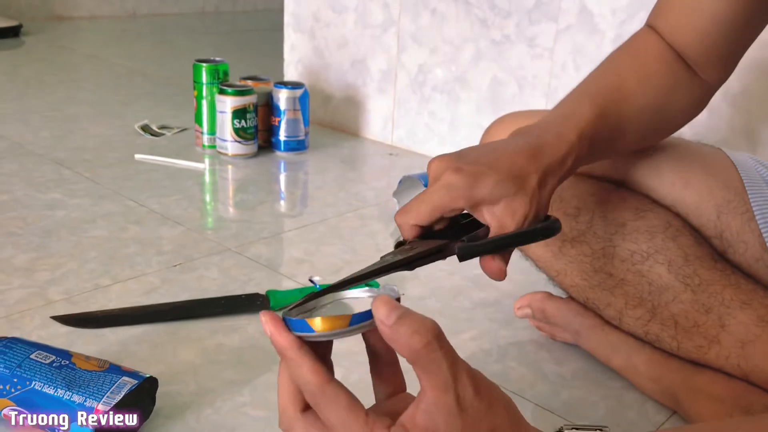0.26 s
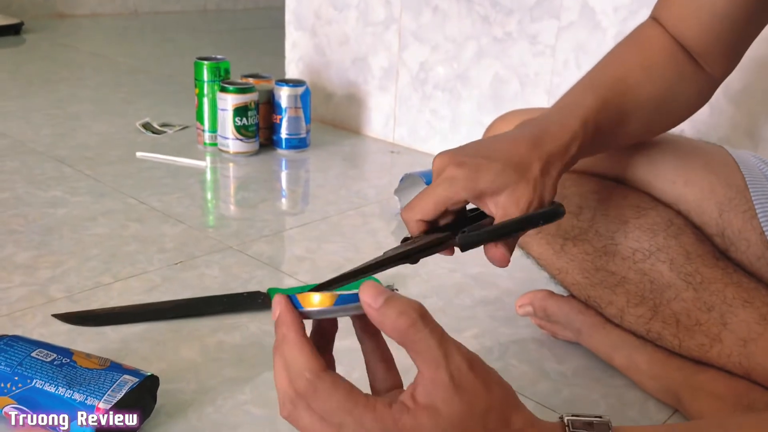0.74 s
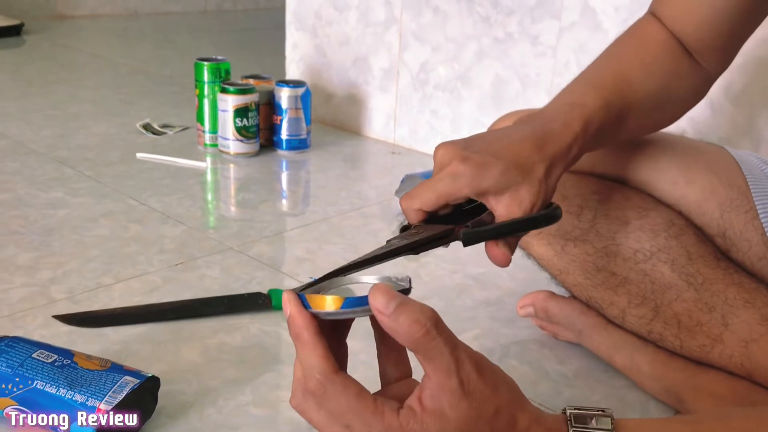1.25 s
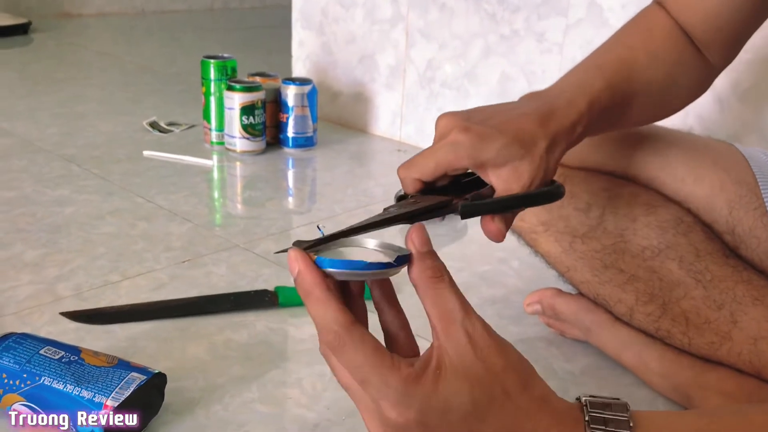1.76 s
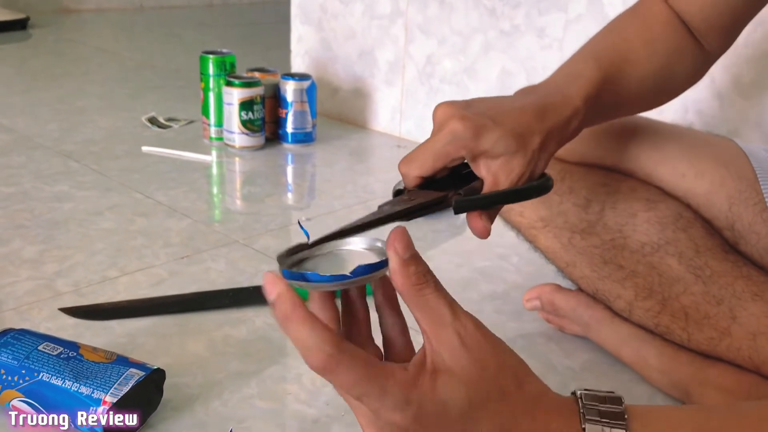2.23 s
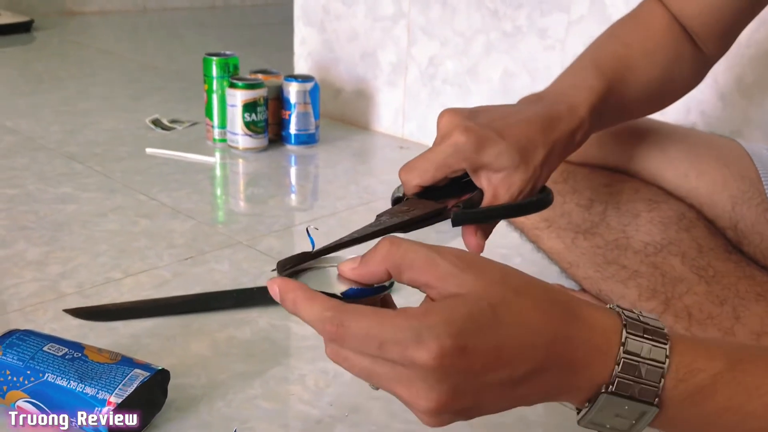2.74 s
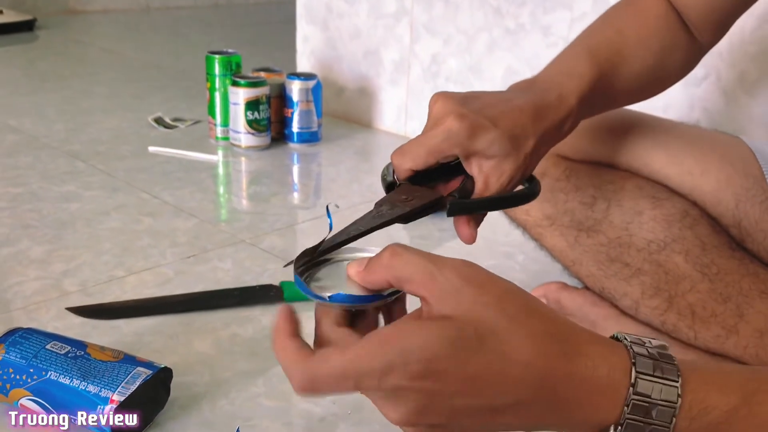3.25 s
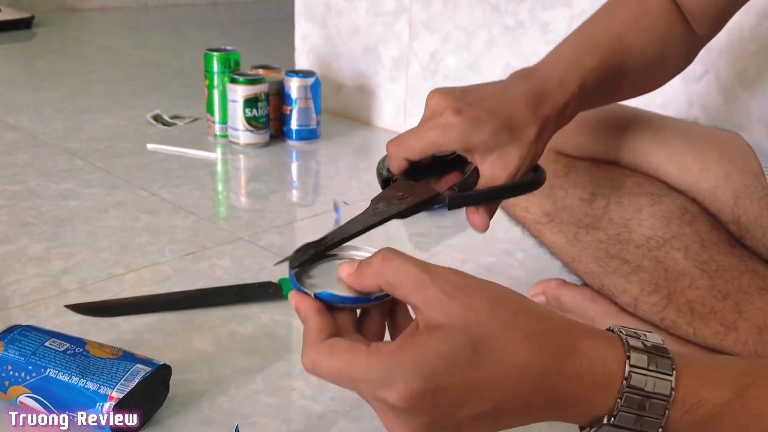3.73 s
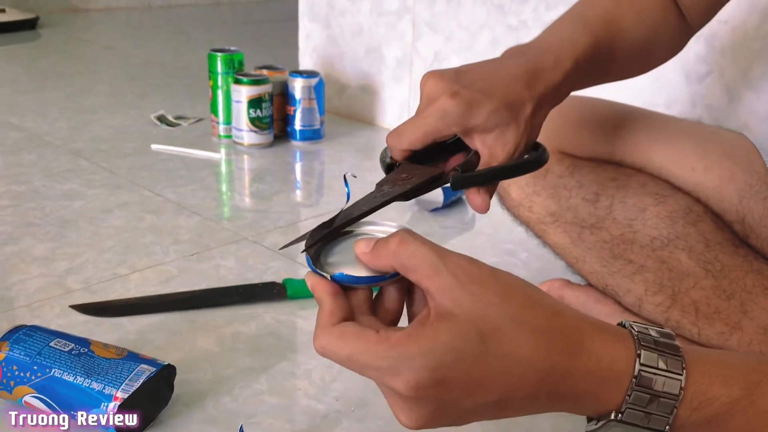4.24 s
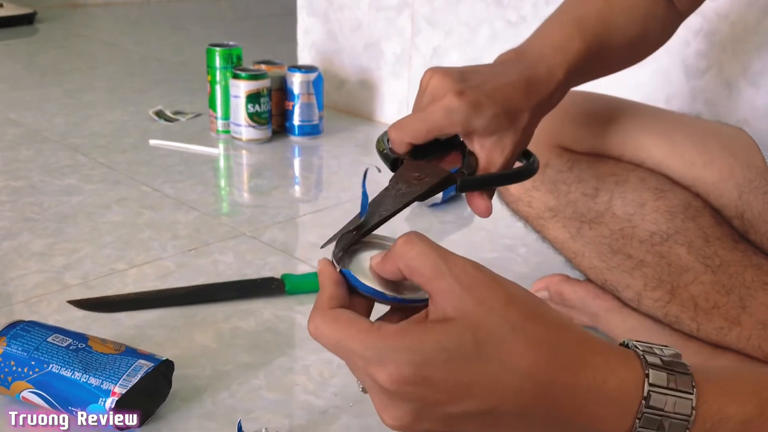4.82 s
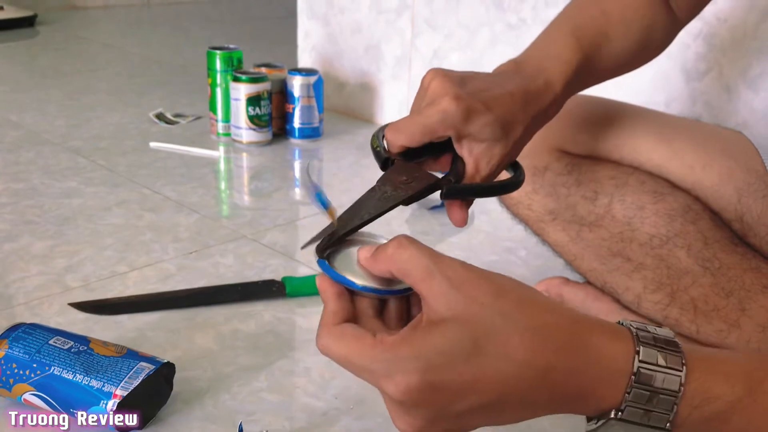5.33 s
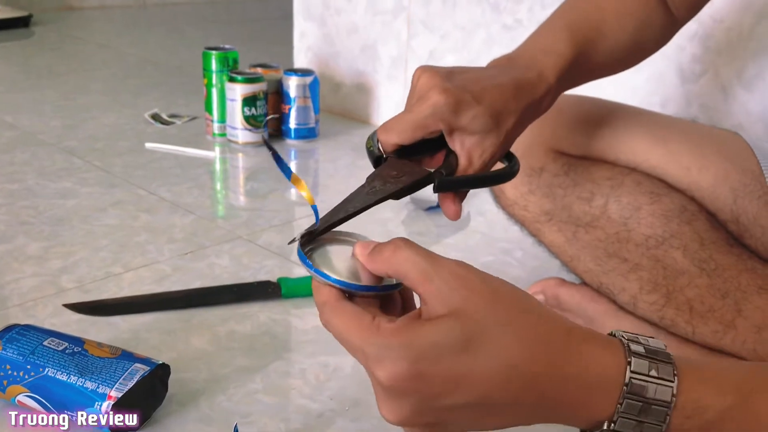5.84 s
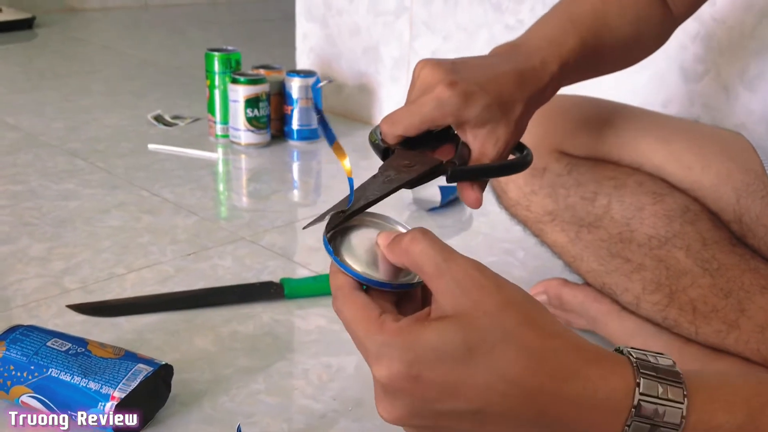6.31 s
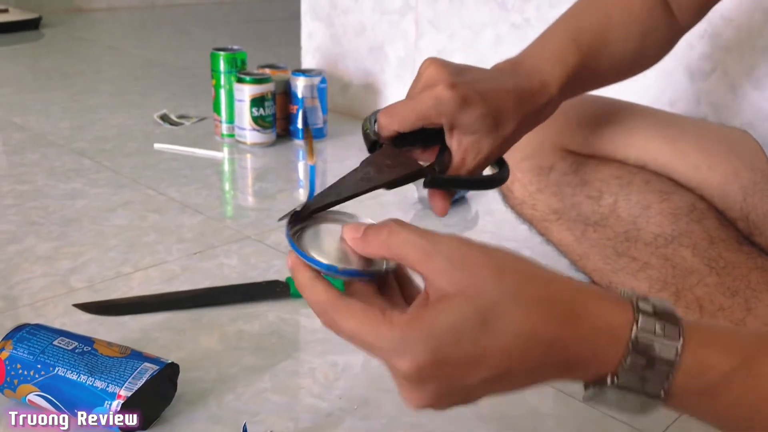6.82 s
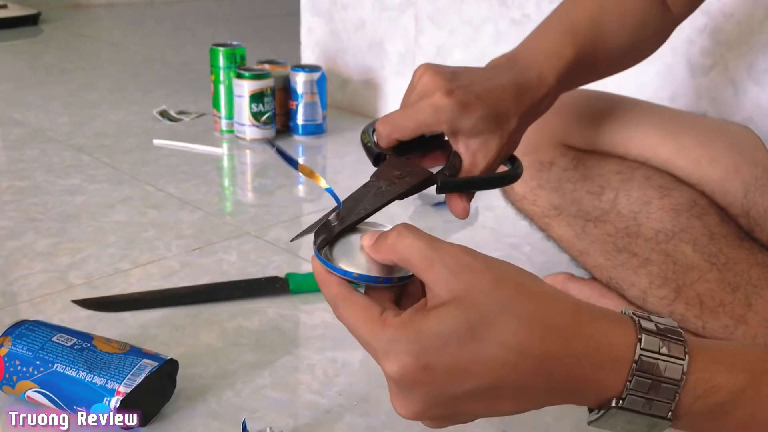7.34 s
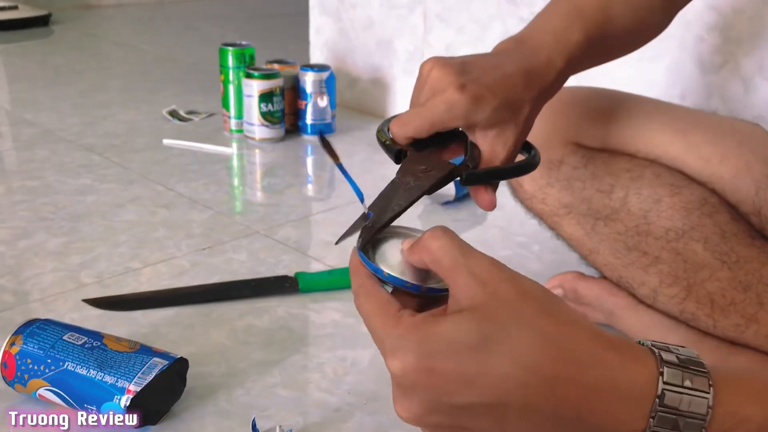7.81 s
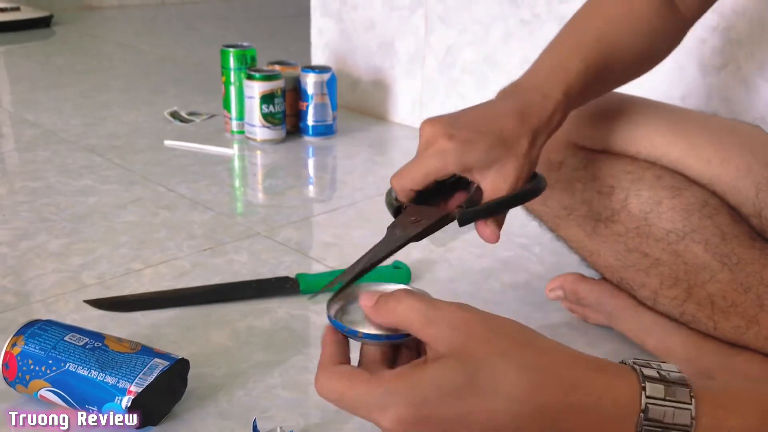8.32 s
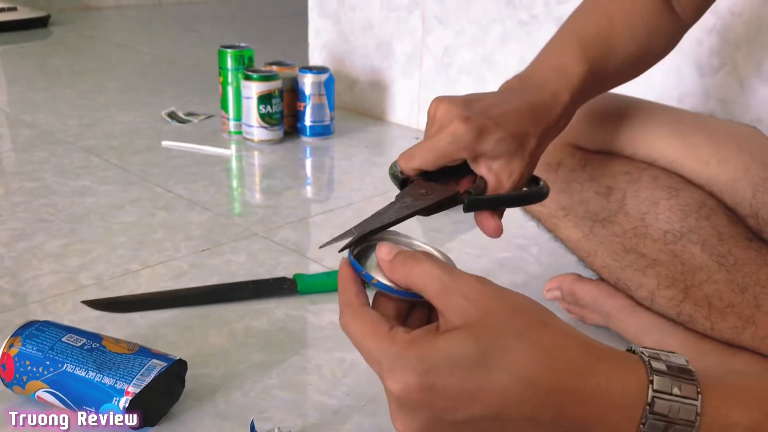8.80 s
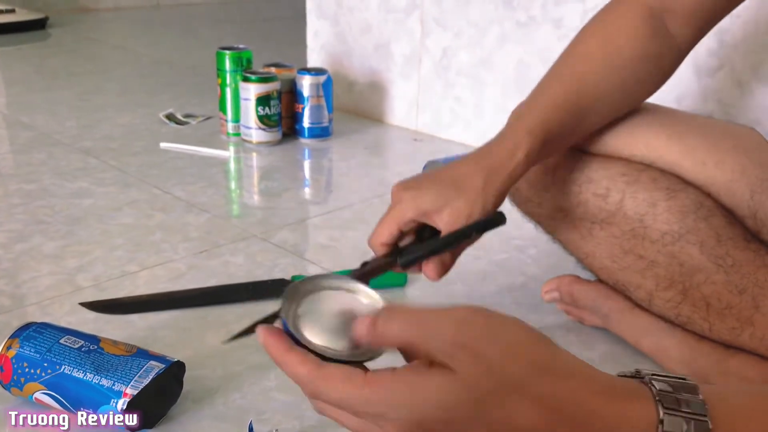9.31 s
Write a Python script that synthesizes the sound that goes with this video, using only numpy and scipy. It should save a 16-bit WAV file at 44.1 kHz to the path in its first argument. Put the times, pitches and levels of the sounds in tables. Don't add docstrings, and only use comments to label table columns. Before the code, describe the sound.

A close phone microphone in a tiled room picks up scissors trimming a thin aluminium can base, over a constant low hum of fans and far traffic. From 0 to 3 s, small dull bites come irregularly: short grainy rasps, ticks and faint creaks, with firmer snips near 0.3, 0.5 and 2.3 s. A soft floor bump falls at about 3.5 s, followed by a tap and metallic tick. A strong, crisp snip cracks near 4.4 s while the traffic swells gently, easing by 6 s; a fainter bump comes near 5.8 s. Cuts continue at 6.4 and 6.8 s, then a very bright, sharp snip at 7.4 s. Around 8.1 s there are handle taps, light scrapes and thin clicks. A brilliant steely bite at 9 s rings on briefly, and quick ticks and a scrape close the stretch around 9.4 to 9.5 s.

```python
import sys
import numpy as np
from scipy import signal
from scipy.fft import rfft, irfft, next_fast_len
from scipy.io import wavfile
from scipy.ndimage import uniform_filter1d

SR = 44100
rng = np.random.default_rng(int(sys.argv[2]) if len(sys.argv) > 2 else 0)


def generate_wav(sig):
    pcm = np.round(np.clip(np.atleast_2d(sig).T, -1, 1) * 32767).astype(np.int16)
    wavfile.write(sys.argv[1], SR, pcm)


def amplitude_ratio(level_db):
    exponent = np.asarray(level_db, float) / 20
    return 10 ** exponent


N = 421596
BLOCK = 12288

# (frequency [Hz], level [dB])
SHEET = [(150, -31), (450, -13), (850, -7.5), (1350, -11), (1950, -5.5), (2700, -6), (4200, 0.5),
         (8400, -6), (15700, -18.5), (16800, -26)]


def curve(points, hz):
    f, v = np.transpose(points)
    return np.interp(np.log(hz + 1), np.log(f), v)


def resonance(hz, centre_hz, width_hz):
    return 1 / (1 + 2j * (hz - centre_hz) / width_hz)


def walk(rate, size=N):
    k = int(SR / rate)
    held = np.repeat(rng.standard_normal(size // k + 1), k)
    return uniform_filter1d(held, k)[:size]


def add(out, x, s):
    i = int(round(s * SR))
    a, b = max(i, 0), min(i + len(x), N)
    out[a:b] += x[a - i:b - i]


def hum():
    # (frequency [Hz], level [dB])
    room_noise = [(20, -26), (50, -13.5), (128, -4), (208, -9.5), (380, -15.5), (1930, -24), (3230, -25.5),
                  (7710, -30), (8830, -26), (10400, -33.5), (15700, -29), (16400, -30)]
    # (frequency [Hz], width [Hz], level [dB])
    drones = [(71.6, 14.6, 5), (128.7, 3.4, 11), (208.6, 10.8, 7.5)]
    # (time [s], level [dB])
    traffic = [
        (0, 0),
        (3.3, 0.5),
        (4.6, 2.5),
        (5.3, 2),
        (6, 0.5),
        (9.56, 0),
    ]
    size = next_fast_len(N, True)
    hz, out = np.fft.rfftfreq(size, 1 / SR), 0
    s, db = np.transpose(traffic)
    swell = np.interp(np.arange(N) / SR, s, db)
    drone = sum(amplitude_ratio(db) * abs(resonance(hz, f, width)) for f, width, db in drones)
    shape = amplitude_ratio(curve(room_noise, hz)) * (1 + drone)
    white = rfft(rng.standard_normal((2, size)))
    for k, centre in enumerate(2 ** np.arange(4.5, 14.5, .5)):
        band = np.cos(np.pi * np.clip(np.log2((hz + 1) / centre), -.5, .5))
        level_db = swell / (1 + (centre / 400) ** 2) + 2.1 * walk(6)
        out = out + irfft(white[k % 2] * shape * band, size)[:N] * amplitude_ratio(level_db)
    return out * amplitude_ratio(-64.5) / np.std(out)


def tiles(x):
    # (frequency [Hz], fall by 60 dB [s])
    room_decay = [(300, 0.53), (2000, 0.37), (4000, 0.31), (16000, 0.22)]
    t, hz, tail = np.arange(BLOCK * 2) / SR, np.fft.rfftfreq(BLOCK * 2, 1 / SR), 0
    for centre in 2 ** np.arange(6., 15):
        band = np.cos(np.pi / 2 * np.clip(np.log2((hz + 1) / centre), -1, 1))
        noise = irfft(rfft(rng.standard_normal(len(t))) * band)
        tail = tail + noise * amplitude_ratio(-60 * t / curve(room_decay, centre))
    tail = tail * (1 - np.exp(-t / 0.0027))
    return signal.fftconvolve(x, tail / np.sqrt(np.sum(tail ** 2)))[:N]


def bumps():
    # (frequency [Hz], level [dB], fall by 60 dB [s])
    floor_modes = [(148.3, 0, 0.26), (199.5, -0.5, 0.13), (334, 2, 0.075), (567, -5, 0.13)]
    # (time [s], level [dB])
    blows = [
        (3.546, -40),
        (5.79, -53.5),
    ]
    # (time [s], level [dB], frequency [Hz])
    taps = [
        (3.6925, -46, 1010),
        (4.9, -48.5, 550),
        (8.088, -40.5, 1340),
        (8.291, -49.5, 730),
        (9.218, -54, 800),
        (9.218, -53, 1820),
        (9.218, -56, 3320),
        (7.378, -47.5, 610),
    ]
    out, t = np.zeros(N), np.arange(BLOCK) / SR
    dull = signal.butter(2, [350, 2000], "bandpass", fs=SR, output="sos")
    for s, blow_db in blows:
        ring = sum(amplitude_ratio(db - 60 * t / t60) * np.sin(2 * np.pi * f * t) for f, db, t60 in floor_modes)
        shaking = rng.standard_normal(BLOCK) * amplitude_ratio(3 * walk(150, size=BLOCK))
        rattle = signal.sosfilt(dull, shaking) * amplitude_ratio(-3.5 - 60 * t / 0.38)
        soft_onset = 1 - np.exp(-t / 0.0025)
        add(out, amplitude_ratio(blow_db) * (ring + rattle) * soft_onset, s)
    for s, db, f in taps:
        add(out, amplitude_ratio(db - 60 * t / 0.017) * np.sin(2 * np.pi * f * t), s)
    return out


def fingers():
    # (time of peak [s], level [dB], frequency [Hz], length [s])
    rustles = [
        (5.092, -68, 308, 0.036),
        (5.846, -73.5, 790, 0.1),
        (6.717, -67.5, 1330, 0.045),
        (8.298, -75, 700, 0.12),
        (8.712, -63, 1000, 0.019),
        (0.985, -70, 1550, .022),
        (8.24, -67, 2000, .07),
        (3.57, -64, 1200, .035),
    ]
    out, t = np.zeros(N), np.arange(2 * BLOCK) / SR
    for s, db, f, length in rustles:
        dull = signal.butter(2, [f / 1.5, f * 1.5], "bandpass", fs=SR, output="sos")
        grain = signal.sosfilt(dull, rng.standard_normal(len(t)) * amplitude_ratio(5 * walk(80, size=len(t))))
        swell = amplitude_ratio(db - 10 * ((t - t.mean()) / length) ** 2)
        add(out, grain / np.std(grain) * swell, s - t.mean())
    return out


def rings():
    # (time [s], frequency [Hz], level [dB], fall by 60 dB [s], roughness [0
    singing = [(.455, 13100, -55, 0.12, .4), (.525, 1830, -47, .36, 0.05), (1.227, 3120, -52.5, 0.24, .5),
               (5.115, 4640, -25, 0.09, 0.3), (5.11, 3370, -28.5, 0.087, 0.37),
               (5.116, 6050, -41, 0.081, 0.7), (5.12, 2160, -33, 0.054, 0.65), (5.54, 3330, -53, 0.23, 0.5),
               (6.118, 3230, -52, 0.23, .5), (7.37, 9900, -52, 0.23, .8), (8.982, 5310, -51, 0.38, 1.2),
               (8.986, 8950, -51, 0.41, 1), (8.984, 6980, -55, 0.52, 0.9), (8.985, 12900, -51.5, 0.33, 0.9),
               (8.985, 14200, -48, 0.18, 0.9), (8.99, 3670, -58.5, 0.33, 1), (8.99, 6160, -58, .25, 1),
               (8.99, 15200, -50, 0.23, 0.9), (8.985, 2270, -46, 0.12, 0.55), (9.41, 2500, -52, 0.11, .6),
               (2.25, 12900, -42, .09, .5), (3.708, 6200, -48, .06, .3), (8.215, 11550, -56, .5, .5),
               (8.22, 14800, -52, .2, .5), (8.21, 13250, -60, .6, .6), (7.375, 4470, -55, .2, .6),
               (7.225, 13700, -46, .1, .6), (.522, 1740, -29, .09, .6), (5.15, 4650, -63, .4, .6)]
    out, t = np.zeros(N), np.arange(BLOCK) / SR
    for s, f, db, t60, rough in singing:
        wander = walk(260, size=BLOCK) + 1j * walk(330, size=BLOCK)
        beats = 1 - rough / 2 + rough * wander
        swell = (1 - np.exp(-(t / .018) ** 2)) * amplitude_ratio(db - 60 * t / t60)
        add(out, swell * np.imag(beats * np.exp(2j * np.pi * f * t)), s)
    return out


def strokes():
    # (time of peak [s], peak [dB], rise [ms], fall [ms], treble over mids [dB])
    bites = [(0.138, -52.5, 40, 16, -2), (0.306, -42, 18, -5.5, 7), (0.544, -39, 17.5, 9.5, -4.5),
             (1.232, -45.5, 10, 19, 2), (1.634, -45, 9, 24.5, 0.5), (2.266, -32, 15, 15, 1),
             (3.066, -41.5, 15, 12, -5), (4.049, -40.5, 16, 13, -2), (4.43, -34.5, 16, 3.5, 10),
             (4.442, -26.5, 6, 4.5, 13), (4.64, -44, 13.5, 14.5, 11), (5.136, -45.5, 13, 14, -4),
             (5.945, -45, 7.5, 25.5, -6), (6.145, -43, 16, 11, -4.5), (6.355, -32.5, 9.5, 16.5, 2.5),
             (7.239, -30.5, 11, 9, 7), (7.366, -32.5, 9, 26, 21), (7.376, -36, 8, 3, 20),
             (7.253, -38, 6, 14, 8), (9.009, -31, 6, 8, 16), (7.695, -41, 16.5, 25, -1),
             (8.19, -55, 14, 30, 7), (8.14, -62, 38, 72, -6), (8.42, -60, 26, 50, 4),
             (8.245, -50, 27, 58, 13), (8.369, -51.5, 36, 48, 1), (8.374, -35, 5, 6, -5),
             (8.387, -37, 28, 4, -3), (8.712, -47.5, 16, 13, 1.5), (8.994, -24.5, 12.2, 12, 22.5)]
    # (time [s], peak [dB], rise [ms], treble [dB])
    snaps = [(0.28, -44, 7.2, 3), (1.065, -51, 4.6, -12), (1.431, -55, 7.6, -7), (1.885, -53.5, 4.6, -15),
             (2.107, -48, 16.5, -6), (2.389, -42, 2.8, 6), (2.544, -63, 9.2, -4), (2.675, -47.5, 14.9, 0),
             (2.941, -53, 9.7, -10), (3.724, -55.5, 40, 8), (4.834, -49.5, 4.8, -7),
             (4.903, -40.5, 4.4, -1), (5.076, -42.5, 3.2, 14.5), (5.182, -61, 40, 2),
             (5.789, -48.5, 6.3, -7), (6.105, -61, 10, -2), (6.584, -38.5, 6, -1.5), (6.643, -55, 11.6, 12),
             (6.788, -35, 2.6, 9), (6.92, -64, 30, 9), (7.593, -46.5, 14, 11), (7.732, -38, 8.8, 12),
             (8.465, -49, 34, -6), (8.491, -42.5, 5.7, -10), (8.872, -53, 33, -10)]
    # (time [s], peak [dB], fall [ms], treble [dB])
    drags = [(0.265, -54, 36, 9), (0.425, -53, 26, 8), (0.507, -52, 15, -7), (1.101, -63, 19, -8),
             (1.373, -57, 34, -10), (2.103, -58, 13, 7), (2.656, -61.5, 23, -4), (2.814, -52.5, 25.3, 2),
             (3.061, -51.5, 42, -10), (3.168, -56, 24, -6), (3.675, -58, 37, -16), (3.76, -47.5, 22, 3),
             (4.303, -51, 27.4, -3), (4.417, -42, 45, 9), (4.744, -49.5, 25.6, -3.5), (5.301, -55, 14, -9),
             (5.316, -55.5, 30, -18), (5.548, -52.5, 59, 3), (5.953, -49, 13, 14), (6.774, -52, 23, 15),
             (6.859, -50.5, 17.5, 5), (7.15, -47.5, 28, 13.5), (7.591, -48.5, 27, -7),
             (7.791, -49, 21.4, -9), (7.957, -59, 27, 9), (8.069, -52, 43, -14), (8.154, -54.5, 10, -9),
             (8.83, -45.5, 25.6, 22), (9.425, -53, 42, 14), (9.426, -48.5, 66, 7)]
    # (time [s], peak [dB], rise and fall [ms], treble [dB])
    rubs = [(0.195, -59.5, 8.8, 2), (0.639, -62, 10, 10), (1.476, -66.5, 12, 15), (1.71, -66, 8.7, 12),
            (3.875, -64, 8, -9), (8.215, -57.5, 30, 6), (8.28, -59, 22, 9), (5.435, -66, 7.8, 17),
            (5.5, -69, 8, 8), (5.36, -65, 20, -2), (2.447, -67.5, 14, 3), (1.826, -52, 7.7, -7),
            (1.978, -56.5, 14.3, -4), (2.824, -54, 17, 0), (3.357, -52, 23, -3), (3.913, -58.5, 10.8, 1),
            (4.087, -49.5, 16, -11), (4.903, -55, 15, -3), (5.016, -56, 15.6, 5), (5.741, -61, 16, -9),
            (6.27, -51.5, 17.4, -6), (8.185, -55, 14, 18), (8.335, -47, 12, -1), (9.551, -53, 37, 8)]
    # (time [s], peak [dB])
    creaks = [(0.663, -73), (0.827, -65.5), (0.876, -66), (0.975, -64.5), (1.026, -65), (1.881, -62.5),
              (2.008, -66.5), (2.961, -67), (3.262, -62), (4.15, -68), (6.707, -63), (7.002, -62),
              (8.02, -61.5)]
    # (time [s], peak [dB], fall [ms], treble [dB])
    ticks = [(0.278, -46, 1, 15), (2.674, -48, 1.5, 0), (3.169, -47.5, 3, -9), (3.753, -40, 4, 0),
             (5.942, -45, 2, -6), (0.302, -28, 6, 6), (0.506, -47, 3, 7), (0.544, -34.5, 0, -9),
             (0.671, -55, 3.5, 11), (2.256, -39, 6, -5), (2.265, -32, -2, 9), (2.379, -56, 6, -8),
             (7.731, -32, 3, 24), (8.454, -44.5, 3, -15), (8.99, -37, -1, 32), (8.996, -29, 3.5, 20.5),
             (9.217, -50, 2.5, -6), (8.236, -55, 0, 8), (1.037, -49, 9, 2), (1.718, -47, 5, 19),
             (2.333, -44, 3, -16), (3.667, -48, 6, 1), (3.693, -33.5, 4.5, -5), (4.178, -42.5, 4.5, -8),
             (4.386, -43, 6, 14), (4.419, -25, 4, 5), (5.537, -48.5, 6.5, 4), (5.652, -46, 4.5, 10),
             (5.734, -45, 2.5, -8), (5.997, -41, 3, 6), (6.304, -50, 1, -12), (7.149, -40, 3, 27),
             (7.379, -20, 2, 25), (7.684, -31, 2.5, 7), (8.067, -38, 3, -3), (8.089, -27.5, 4.5, 2),
             (8.12, -38.5, 7, -8), (8.293, -43, 3.5, -5), (8.561, -47.5, 3, 4), (8.839, -32.5, 4.5, 17.5),
             (9.436, -29, 4, 7), (9.46, -30, 3.5, 10.5), (9.515, -41, 2.5, 7), (9.551, -39, 2, 18),
             (7.376, -31.5, 2, -12), (9.467, -42, 3, 8), (9.478, -46, 3, 3)]
    # (time [s], peak [dB], treble [dB])
    clicks = [(0.018, -61, 8), (0.36, -49, -5), (0.394, -51, -14), (0.664, -55, 11), (0.98, -60, 6),
              (1.315, -49.5, 5), (1.666, -52, 4), (1.748, -59, -4), (2.161, -59.5, 3), (3.985, -66, 0),
              (2.426, -56, 4), (2.89, -63, 6), (2.923, -56.5, -11), (2.961, -51, -3), (4.02, -64, -18),
              (4.056, -55, -6), (5.046, -54.5, 5), (5.213, -57.5, -1), (5.512, -53.5, 6), (6.284, -49, -11),
              (6.436, -49.5, -4), (6.509, -64, 6), (6.628, -52.5, -5), (6.892, -55, 7), (7.102, -53.5, 3),
              (7.525, -58.5, -11), (8.596, -57, -1), (8.642, -55, 3), (9.167, -54, -5), (9.325, -64, -10),
              (7.069, -56, 0), (7.081, -59, 10), (8.152, -53, 0), (8.18, -54, 12), (8.242, -52, 8),
              (8.332, -51, -3), (9.455, -48, 5), (6.52, -62, -10), (0.375, -58, 14), (4.671, -59, 3)]
    tick_rise_ms = 1.58
    return (bites
            + [(s, db, ms, 1.18 + 0.095 * ms, treble) for s, db, ms, treble in snaps]
            + [(s, db, 5.2 + 0.086 * ms, ms, treble) for s, db, ms, treble in drags]
            + [(s, db, ms, ms, treble) for s, db, ms, treble in rubs]
            + [(s, db, 9.4, 24.4, 2) for s, db in creaks]
            + [(s, db, tick_rise_ms, ms, treble) for s, db, ms, treble in ticks]
            + [(s, db, tick_rise_ms, 4.3, treble) for s, db, treble in clicks])


def body(hz, grip):
    rim_hz = 1770
    luck = rng.standard_normal((2, 8))
    rim = sum(amplitude_ratio(-6 + 3.5 * luck[0, k]) * resonance(hz, rim_hz * (k + 1 + luck[1, k] / 10), 360)
              for k in range(8))
    lesser = sum(amplitude_ratio(4 * a) * resonance(hz, 1500 + 14000 * f, 220) for f, a in rng.random((16, 2)))
    h = (1 + rim + lesser) * amplitude_ratio(curve(SHEET, hz))
    return h / np.sqrt(np.mean(abs(h) ** 2)), grip


def free_modes(hz, grip):
    scatter_db, bend_hz, width_hz = 2, 70, 520
    luck, out = rng.standard_normal((3, 2)), 0
    for k, f in enumerate(grip[1:-1]):
        level_db = grip[-1] - 1.5 * k + scatter_db * luck[k, 0] + 0.39 * curve(SHEET, f) + 3.0
        out = out + amplitude_ratio(level_db) * resonance(hz, f + bend_hz * luck[k, 1], width_hz) ** 2
    return out


def rasp(pressure, hz, grain):
    angle, size = hz / 900 + 2 * np.pi * rng.random(), len(pressure)
    slips = [pressure * rng.standard_normal(size) * amplitude_ratio(3.6 * grain * walk(250, size=size))
             for _ in range(2)]
    return rfft(slips[0]) * np.cos(angle) + rfft(slips[1]) * np.sin(angle)


def brighten(h, hz, treble_db):
    mids, top = (hz > 1400) & (hz < 6500), hz > 8000
    ratio = np.sum(abs(h[top]) ** 2) / np.sum(abs(h[mids]) ** 2)
    shelf = 1 / (1 + (10000 / (hz + 1)) ** 6)
    h = h * (amplitude_ratio(treble_db) / np.sqrt(ratio)) ** shelf
    h = h * amplitude_ratio(-0.36 * treble_db / (1 + (hz / 2000) ** 4))
    return h / np.sqrt(np.mean(abs(h) ** 2))


def shears():
    # (start [s], mode [Hz], mode [Hz], mode [Hz],
    # ring [dB])
    firm_grips = [(0.0, 1830, 4580, 9200, 8.8), (0.24, 4600, 4000, 9720, 8), (0.34, 5540, 8800, 3400, 5),
                  (0.41, 5000, 12700, 6500, 6), (0.49, 1870, 9480, 3600, 9), (0.6, 9460, 14500, 8560, 15),
                  (1.15, 3120, 14600, 9200, 8), (1.6, 3940, 3300, 1620, 7), (2.22, 4300, 12900, 9000, 5),
                  (2.3, 3720, 8700, 13000, 5.3), (3.02, 4160, 2370, 5600, 5.3),
                  (3.62, 8500, 13700, 5800, 7), (3.685, 3280, 8310, 2100, 10), (3.7, 6200, 8400, 13000, 6),
                  (3.745, 8400, 2240, 3300, 8), (4.0, 3470, 5000, 2050, 6), (4.13, 6700, 5420, 4140, 5.2),
                  (4.36, 8300, 2180, 4100, 9), (4.6, 5600, 15480, 12000, 2.4), (5.1, 3370, 5900, 7200, 7),
                  (5.28, 3760, 5570, 6800, 13), (5.49, 3300, 4000, 9000, 7), (5.91, 4160, 3500, 9230, 6),
                  (6.08, 3270, 4330, 1880, 9), (6.24, 3900, 2160, 3340, 21), (6.32, 4380, 3500, 6050, 4),
                  (6.55, 3400, 4200, 12000, 8), (6.76, 9040, 7600, 3600, 10), (7.21, 1980, 3370, 8600, 7),
                  (7.245, 6500, 8600, 13700, 5), (7.34, 12500, 13700, 11550, 11),
                  (7.56, 5170, 8770, 3500, 3.7), (7.66, 3370, 4920, 2170, 9.7),
                  (7.72, 13700, 3500, 7040, 8), (7.93, 5800, 12500, 3820, 5.8),
                  (8.14, 3920, 8910, 15150, 6), (8.17, 11500, 15200, 6740, 4.5),
                  (8.21, 14700, 11400, 8200, 5.9), (8.27, 13300, 11500, 9750, 8),
                  (8.32, 5340, 3650, 2100, 12), (8.44, 3660, 5230, 6650, 14), (8.8, 8500, 12550, 7300, 20),
                  (8.835, 8420, 12600, 5100, 15), (8.845, 7340, 4700, 2400, 7),
                  (8.96, 13000, 14300, 9000, 7), (9.4, 9100, 12000, 6850, 10),
                  (9.49, 6500, 11500, 14500, 8), (9.525, 11800, 8800, 6500, 9)]
    dish_hz = [2030, 3370, 4140, 5500, 5900, 7100, 9100]
    hold_s, brief_ms = .2, 24
    out, hz = np.zeros(N), np.fft.rfftfreq(BLOCK, 1 / SR)
    grips = firm_grips
    loose_grips = [(0, *rng.permutation(dish_hz)[:3], 3) for _ in range(12)]
    firm = [body(hz, grip) for grip in grips]
    loose = [body(hz, grip) for grip in loose_grips]
    starts = np.array(grips)[:, 0]
    for s, db, rise, fall, treble_db in strokes():
        step = 3 if 2 * rise < brief_ms and fall < brief_ms else 1
        lead = BLOCK // step // 3
        ms = (np.arange(BLOCK // step) - lead) * 1000 / SR
        span_ms = np.clip(np.where(ms < 0, rise, fall) - .9, .4, 80)
        pressure = amplitude_ratio(db - 10 * (abs(ms) / span_ms) ** (1.59 if rise > 2 else 1.15))
        k = max(np.searchsorted(starts, s) - 1, 0)
        held = s - starts[k] < hold_s
        sheet, grip = firm[k] if held else loose[int(s / hold_s) % len(loose)]
        pumped = np.clip((rise + fall) / 16, .2, 1)
        colour = sheet[::step] + free_modes(hz[::step], grip) * pumped
        slips = rasp(pressure, hz[::step], min((rise + fall) / 20, 1))
        bite = irfft(slips * brighten(colour, hz[::step], treble_db))
        add(out, bite * np.sqrt(np.sum(pressure ** 2) / np.sum(bite ** 2)), s - lead / SR)
    return out


def scene():
    near = shears() + rings() + bumps() + fingers()
    return (near + amplitude_ratio(-14.5) * tiles(near) + hum())[None]


def top_cut(x):
    return signal.sosfilt(signal.butter(12, 16800, fs=SR, output="sos"), x)


def record(dry):
    top = signal.ellip(6, .2, 22, 15780, fs=SR, output="sos")
    return top_cut(signal.sosfilt(top, dry))


dry = scene()
out = record(dry)
generate_wav(out)
```